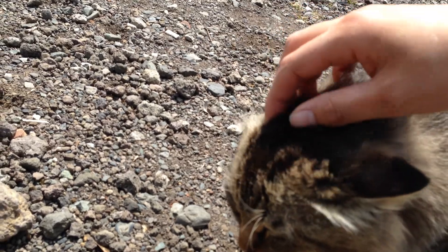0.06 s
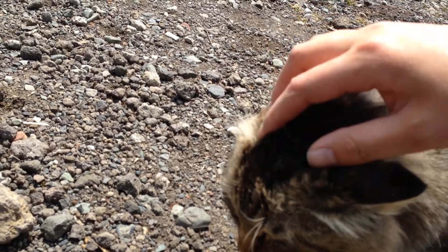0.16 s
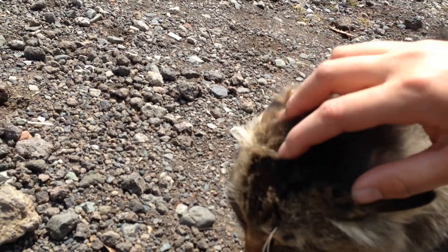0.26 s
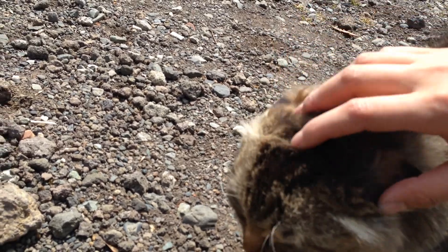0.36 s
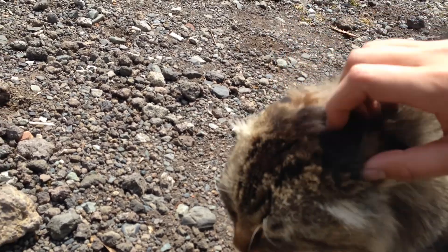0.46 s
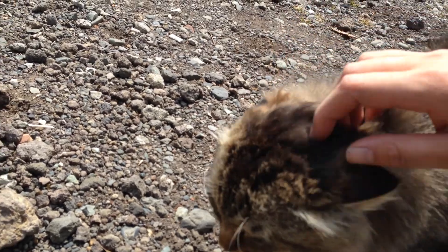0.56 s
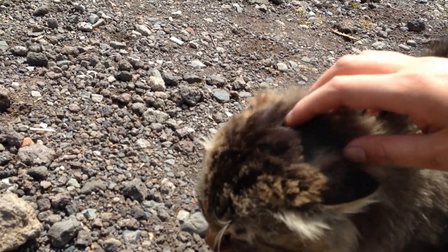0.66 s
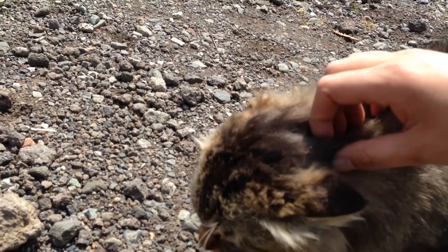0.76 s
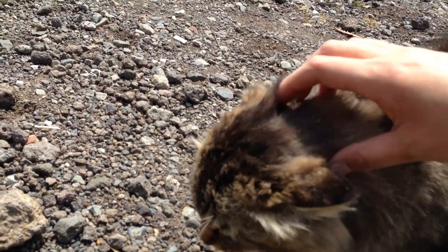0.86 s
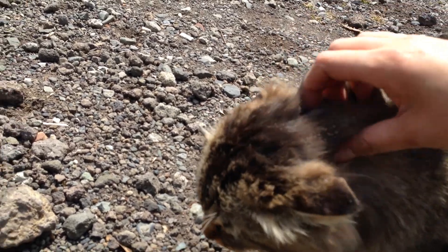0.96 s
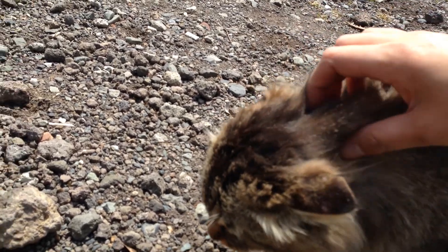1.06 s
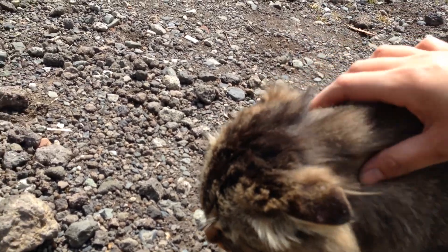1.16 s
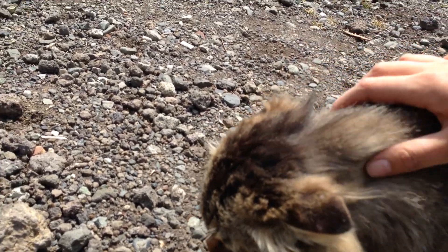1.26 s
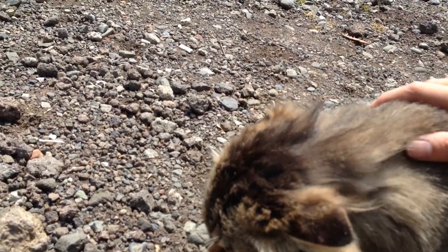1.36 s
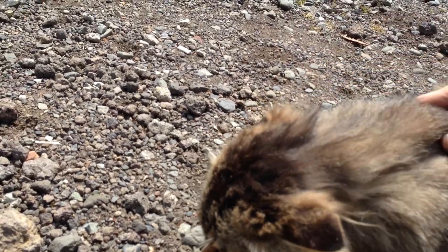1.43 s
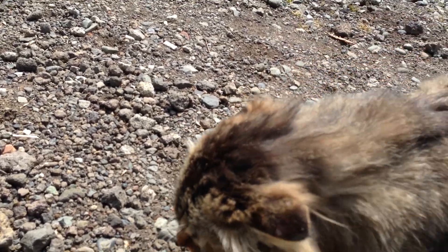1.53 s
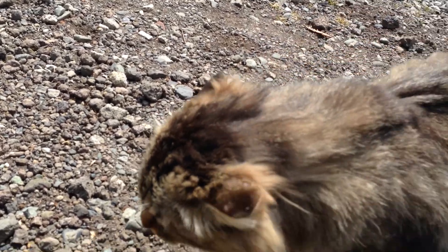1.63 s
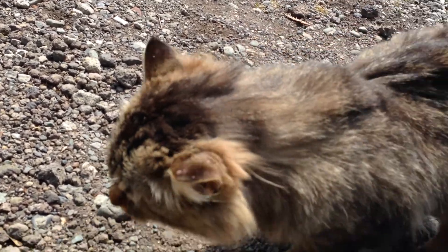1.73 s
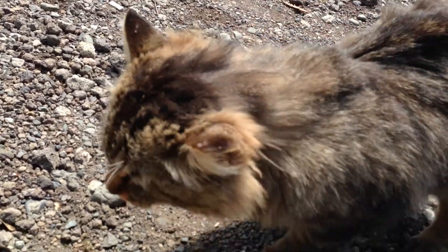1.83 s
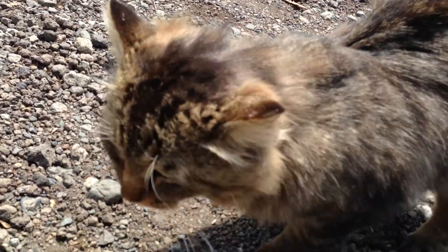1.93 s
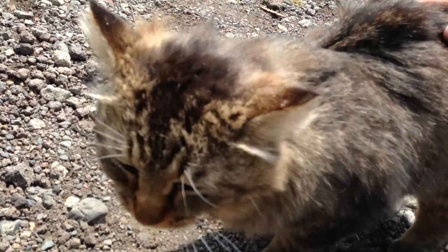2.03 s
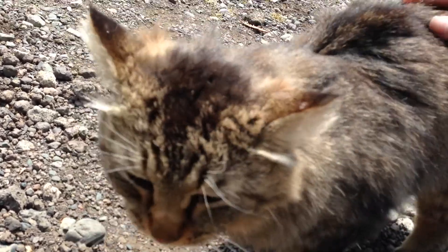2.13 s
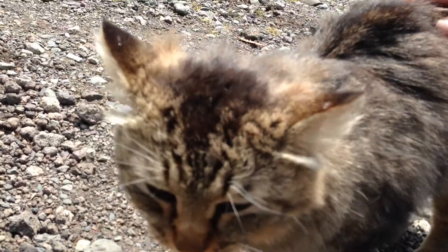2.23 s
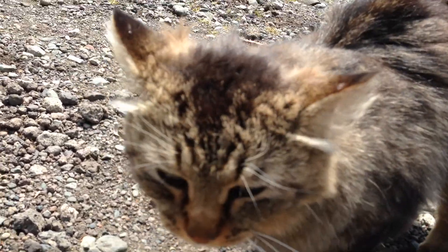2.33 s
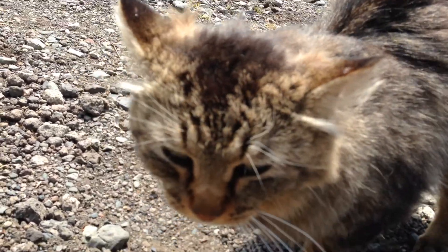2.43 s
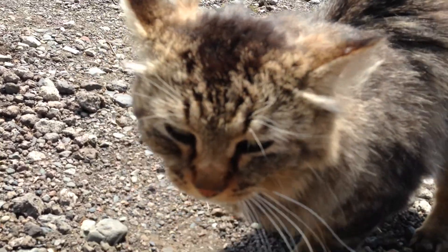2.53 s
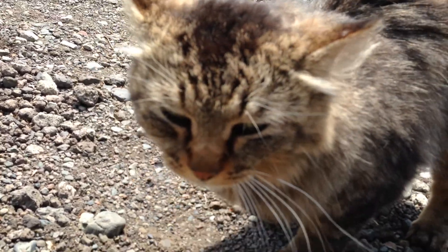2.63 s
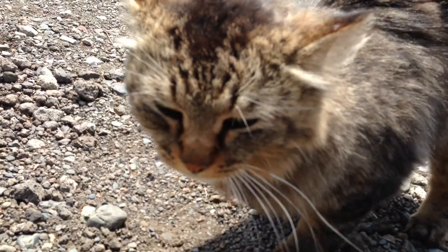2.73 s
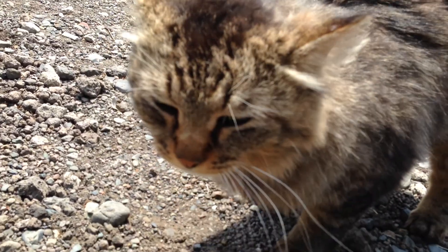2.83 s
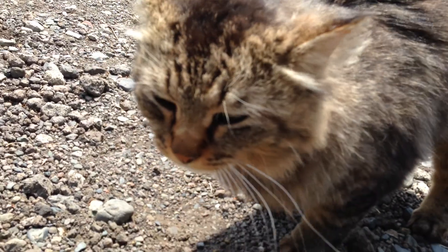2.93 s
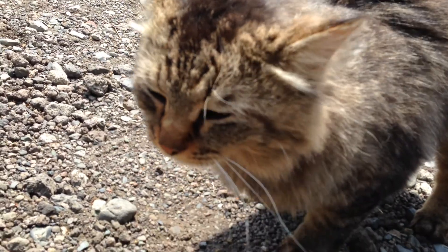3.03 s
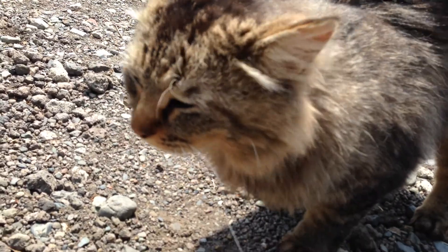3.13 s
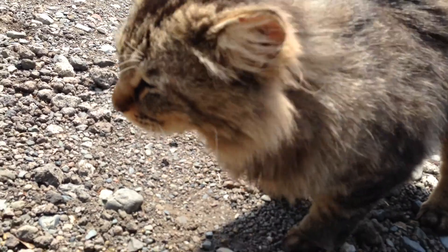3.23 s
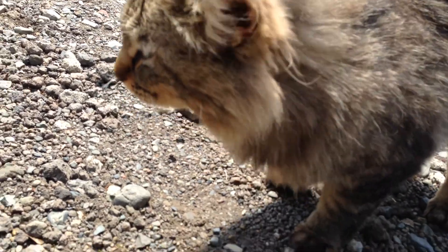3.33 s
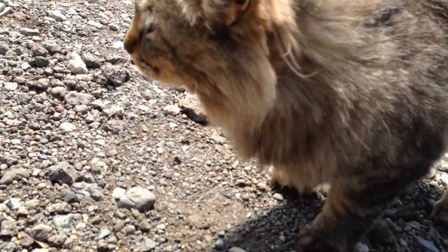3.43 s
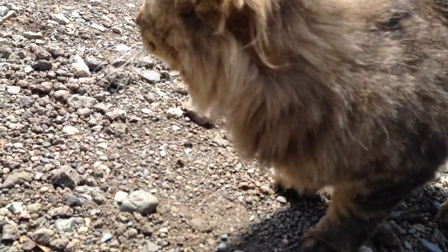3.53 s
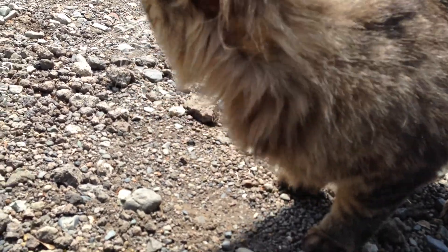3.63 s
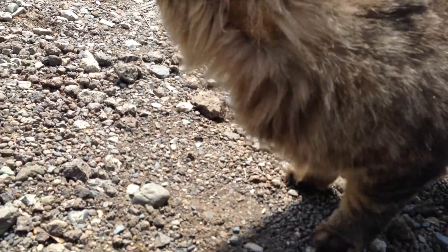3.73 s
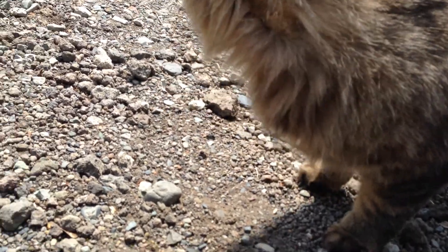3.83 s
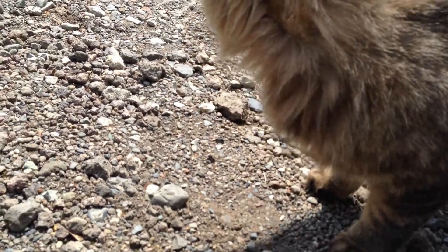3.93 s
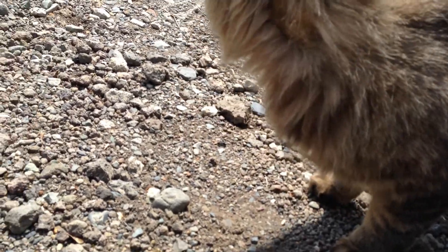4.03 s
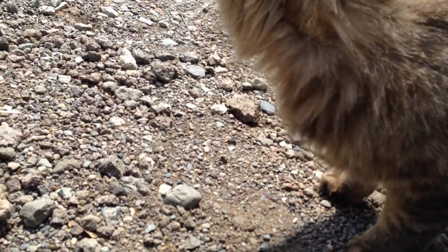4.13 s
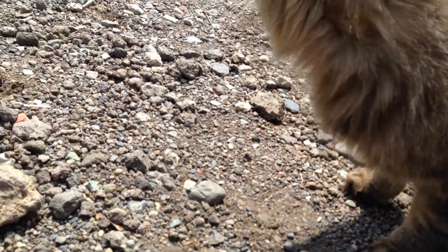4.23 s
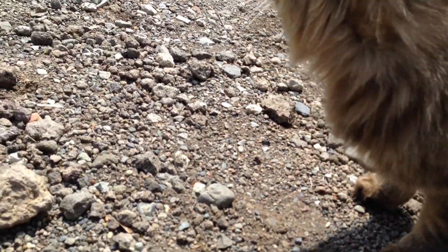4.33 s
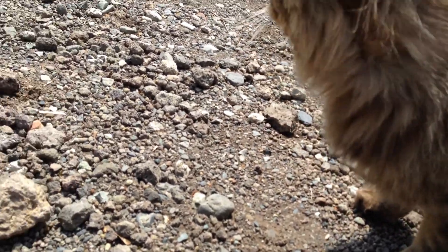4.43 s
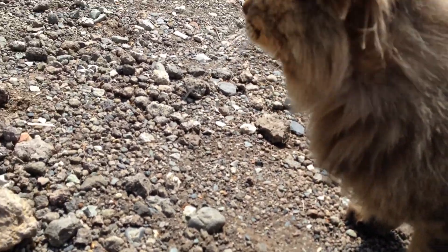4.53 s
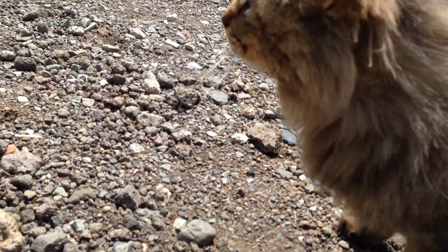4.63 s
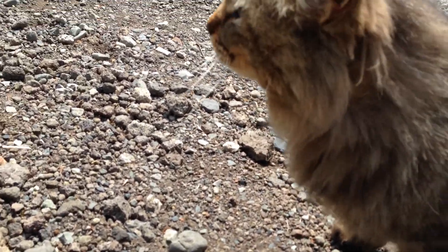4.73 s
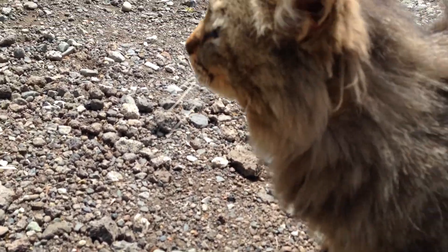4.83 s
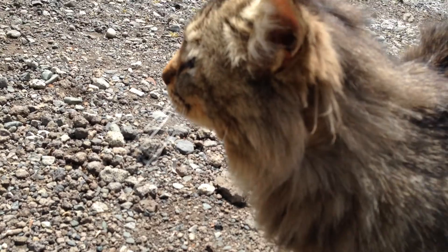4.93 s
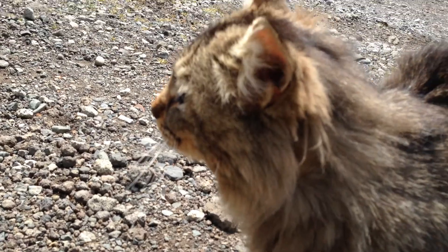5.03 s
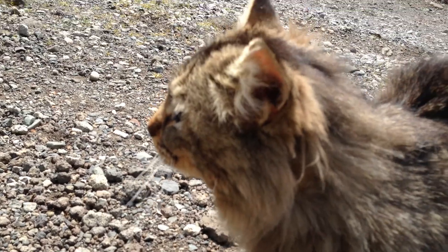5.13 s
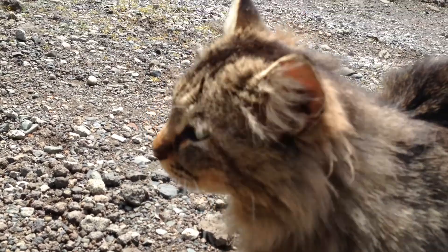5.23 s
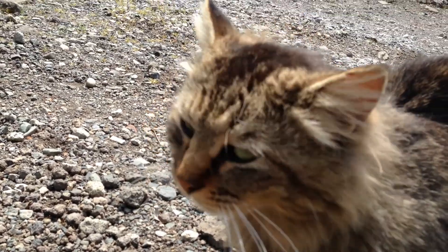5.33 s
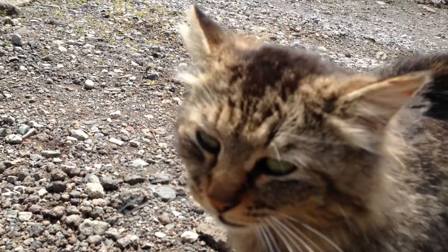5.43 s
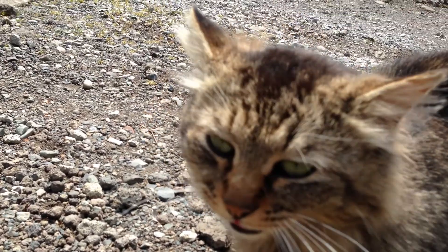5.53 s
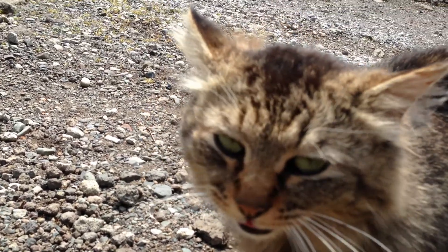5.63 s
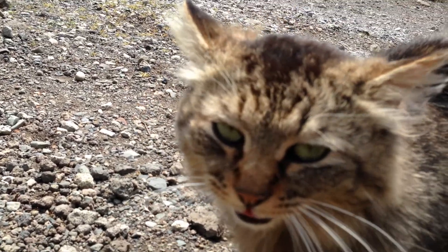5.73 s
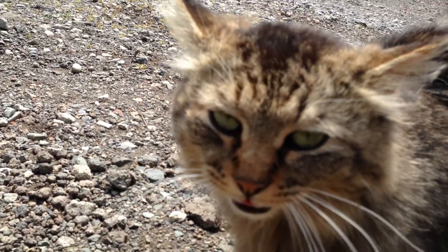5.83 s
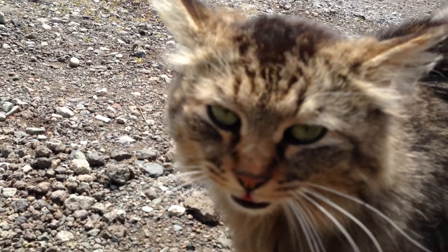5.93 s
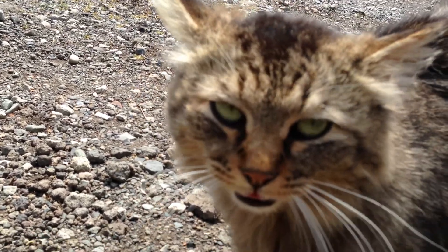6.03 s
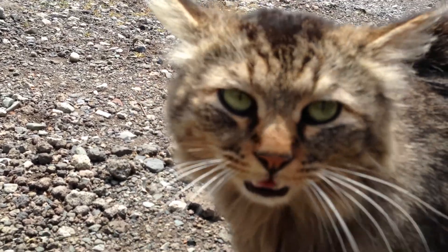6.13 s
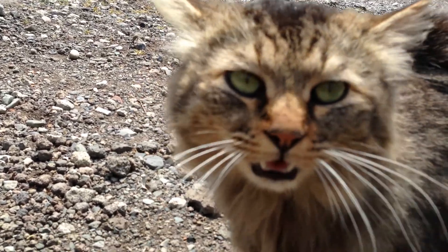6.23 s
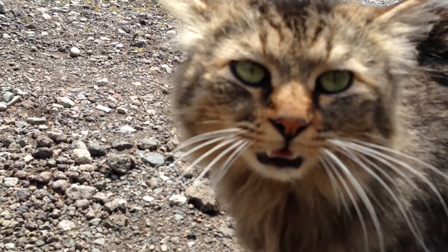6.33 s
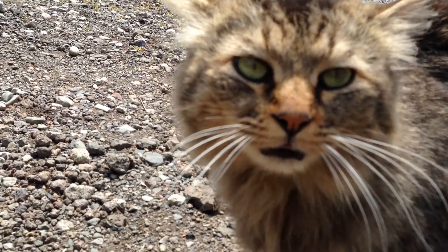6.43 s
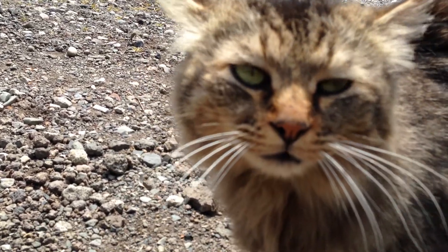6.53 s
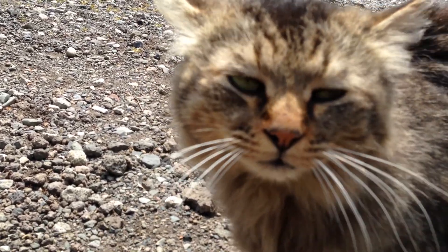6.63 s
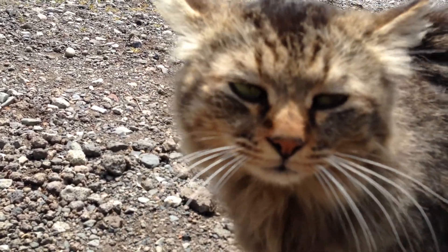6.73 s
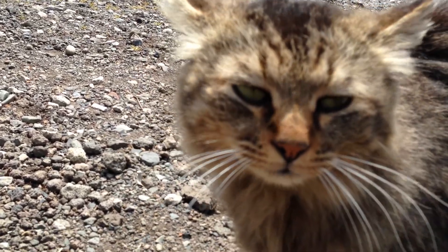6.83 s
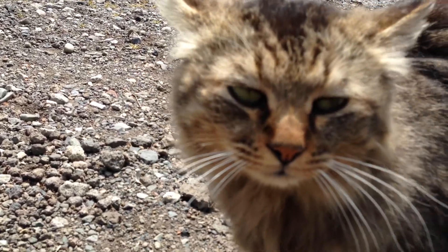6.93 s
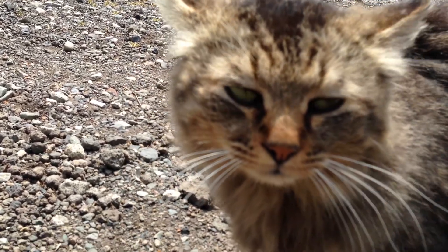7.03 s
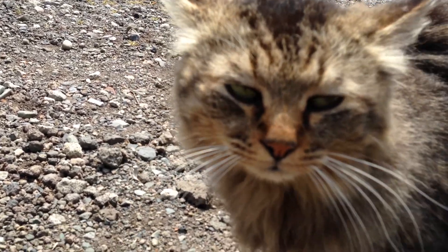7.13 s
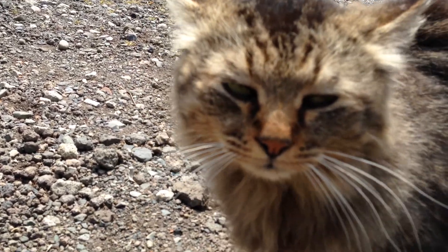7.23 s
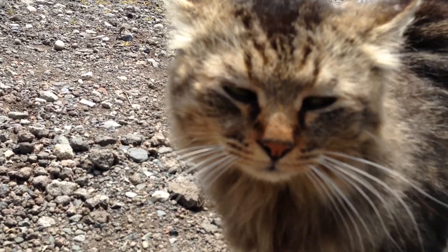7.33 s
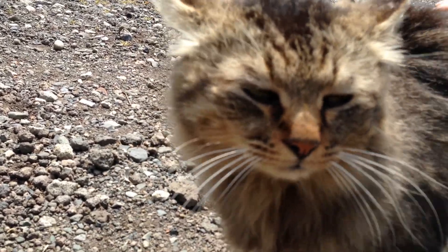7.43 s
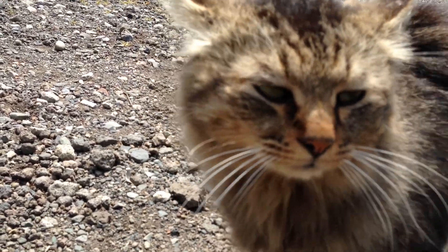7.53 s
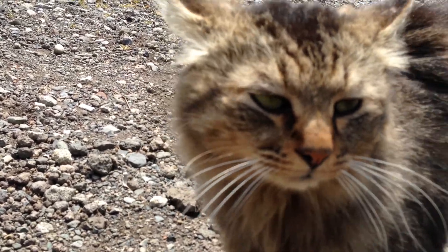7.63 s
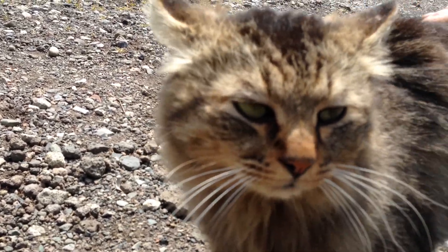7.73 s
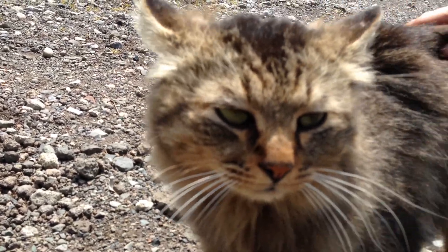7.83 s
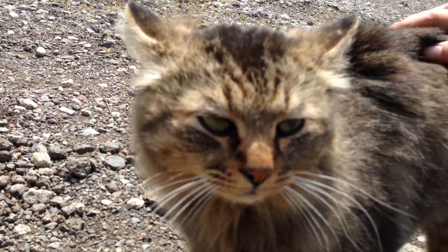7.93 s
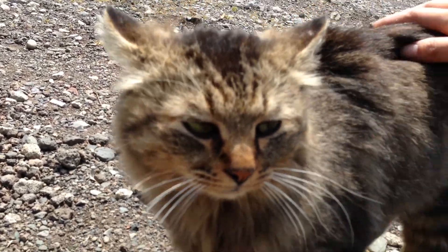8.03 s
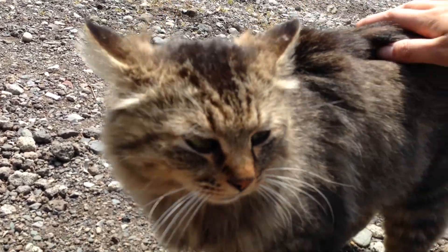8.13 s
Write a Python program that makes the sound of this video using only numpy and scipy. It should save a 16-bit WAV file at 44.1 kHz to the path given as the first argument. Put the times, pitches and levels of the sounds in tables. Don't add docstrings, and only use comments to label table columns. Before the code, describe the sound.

A quiet outdoor place, picked up by a small close microphone: soft hiss, low heaving wind and a faint far motor hum. A gritty tick opens it, and a distant bird trills in quick falling whistles from 0.2 to 0.75 s. Small wind puffs follow. From about 2.5 to 3.3 s the nearby cat gives a purring trill, around 30 pulses a second, raspy and mid-pitched, with a tiny break near 2.8 s, while another far bird sings. Wind bumps thud from 3.3 to 5 s; a nearer bird drops sweeping notes around 4 s. At 5.35 s a few purred pulses lead into a clear meow, near 470 Hz, rising slightly by 5.8 s, then sagging and wavering until a rough close at 6.4 s, amid a bird trill and strong wind thumps. Afterwards come faint fur rustle, small ticks around 7 s, and a last distant trill near 7.5 s.

```python
import sys
import numpy as np
from scipy import signal
from scipy.fft import rfft, irfft
from scipy.io import wavfile
from scipy.ndimage import uniform_filter1d

SR = 44100
rng = np.random.default_rng(int(sys.argv[2]) if len(sys.argv) > 2 else 0)


def to_linear_factor(level_db):
    exponent = np.asarray(level_db, float) / 20
    return 10 ** exponent


def int16_out(signal):
    q = np.round(np.clip(np.atleast_2d(signal).T, -1, 1) * 32767)
    wavfile.write(sys.argv[1], SR, q.astype(np.int16))


N = 360267
TIME = np.arange(N) / SR

# start in seconds, length in ms, pitch in Hz, level in dB.
BURSTS = [(2.514, 15.6, 506, -48.5), (2.54, 6.5, 527, -55), (2.562, 3.6, 543, -58), (2.577, 5.9, 446, -47),
          (2.611, 20, 459, -46), (2.644, 14, 439, -46), (2.678, 14.6, 433, -46.5), (2.711, 23, 456, -45),
          (2.745, 21, 483, -44.5), (2.78, 14.4, 571, -48), (2.847, 3.9, 517, -55), (2.864, 4.7, 526, -53.5),
          (2.886, 22, 493, -47.5), (2.919, 16, 583, -50), (2.957, 20, 510, -48.5), (2.988, 25, 478, -48),
          (3.024, 25, 500, -49), (3.061, 24.5, 498, -47), (3.096, 23, 566, -51), (3.131, 16.7, 469, -48),
          (3.168, 31, 472, -47), (3.207, 21, 440, -48), (3.238, 24, 547, -56.5), (5.346, 6, 476, -50.5),
          (5.367, 16, 475, -44), (5.403, 15, 476, -44), (5.431, 24, 464, -42.5), (6.348, 20.5, 587, -41),
          (6.383, 6, 440, -54)]


def noise():
    return rng.standard_normal(N)


def unit(x):
    return x / np.sqrt(np.mean(x ** 2))


def band(x, lo_hz, hi_hz, order=2):
    return signal.sosfilt(signal.butter(order, [lo_hz, hi_hz], "band", fs=SR, output="sos"), x)


def zero_phase(x, edge_hz, kind):
    return signal.sosfiltfilt(signal.butter(2, edge_hz, kind, fs=SR, output="sos"), x)


def walk(rate):
    k = int(SR / rate)
    steps = np.repeat(rng.standard_normal(N // k + 1), k)
    return unit(uniform_filter1d(uniform_filter1d(steps, k), k)[:N])


def curves(t, table):
    s, *columns = np.transpose(table)
    return [np.interp(t, s, c) for c in columns]


def peak(hz, centre_hz, width_hz):
    return 1 / (1 + (2 * (hz - centre_hz) / width_hz) ** 2)


def tract(hz, modes):
    return sum(to_linear_factor(db) * peak(hz, f, w) for f, w, db in modes)


def add(out, s, piece):
    i = int(s * SR)
    out[i:i + len(piece)] += piece[:len(out) - i]


def air():
    # frequency in Hz, density in dB per Hz.
    colour = [(15, -44), (25, -8), (53, 2.5), (113, -8.5), (140, -5), (260, -9), (290, -10.5), (458, -13.5),
              (583, -16), (685, -23.5), (1540, -25), (3350, -26.5), (4630, -26), (5020, -27.5),
              (15600, -31.5)]
    # time in seconds, level in dB.
    gust = [(0.0, -55.5), (0.45, -56.5), (0.91, -59), (1.71, -62), (2.25, -62), (2.57, -58.5),
            (2.91, -59.5), (3.46, -59), (3.69, -60), (4.53, -56), (5.03, -61.5), (5.75, -56), (5.96, -59),
            (6.48, -47), (6.67, -63), (7.39, -56.5), (7.6, -56.5), (8.17, -58)]
    hz = np.fft.rfftfreq(N, 1 / SR)
    f, db = np.transpose(colour)
    shape = to_linear_factor(np.interp(np.log(hz + 1), np.log(f), db))
    floor = unit(irfft(rfft(noise()) * shape, N)) * to_linear_factor(-59.5)
    gust_db = curves(TIME, gust)[0]
    gust_db = gust_db - np.median(gust_db)
    low = zero_phase(floor, 170, "low")
    below_hiss = zero_phase(floor, 650, "low")
    bass = low * to_linear_factor(gust_db + 3.0 * walk(14))
    middle = (below_hiss - low) * to_linear_factor(0.41 * gust_db + 1.3 * walk(9) + 1.3 * walk(3.19))
    hiss = (floor - below_hiss) * to_linear_factor(0.58 * walk(0.95))
    return bass + middle + hiss


def hum():
    # frequency in Hz, rms level in dB.
    lines = [(48, -66.5), (144, -79)]
    drift = np.cumsum(1 + 0.0124 * walk(2.2)) / SR
    out = 0
    for hz, db in lines:
        level_db = db + (2.0 + hz / 60) * walk(1.43)
        out = out + np.sqrt(2) * to_linear_factor(level_db) * np.sin(2 * np.pi * hz * drift)
    return out


def ticks():
    # start in seconds, peak level in dB, pitch in Hz, ring in ms.
    touches = [(0.023, -37.5, 4860, 0.54), (1.516, -51, 5200, 1.1), (1.568, -47.5, 1000, 1.6),
               (2.448, -46.5, 1330, 2.6), (2.499, -52, 1580, 3.5), (2.5494, -51.5, 4030, 5),
               (2.5487, -51.5, 6100, 5), (3.294, -52.5, 1710, 20), (5.312, -55, 1000, 7.2),
               (5.366, -57, 5000, 7.4), (5.3661, -57, 7000, 5.2), (6.4758, -48.5, 3580, 5.5),
               (6.4764, -48.5, 2520, 5.7), (6.916, -54, 1270, 6.3), (6.962, -43, 1790, 1.6),
               (7.005, -52, 1500, 2.3), (7.048, -39, 1010, 2.1), (7.077, -56, 2510, 5.4),
               (7.098, -58, 1870, 6.6), (7.19, -56, 1300, 3), (7.227, -52, 1300, 2.3), (7.27, -53, 1500, 3),
               (7.335, -57, 1110, 5), (7.448, -52, 1200, 2.5)]
    out, t = np.zeros(N), np.arange(0, .04, 1 / SR)
    for s, db, hz, ms in touches:
        touch = 1 - np.exp(-(t * hz / 0.14) ** 2)
        decay = np.exp(-np.log(1000) * t / (3 * ms / 1000))
        add(out, s, to_linear_factor(db) * touch * np.sin(2 * np.pi * hz * t) * decay)
    return out


def puffs():
    # time in seconds, peak level in dB, pitch in Hz, length in ms.
    strong = [(0.15, -47.5, 78, 15), (0.51, -47, 63.6, 17), (1.181, -49, 82.5, 32),
              (1.235, -46.5, 84.4, 30), (1.768, -49.5, 70, 31), (3.275, -32.5, 82.6, 3.1),
              (3.305, -35, 80.4, 5.8), (3.365, -35, 93.5, 12), (3.845, -45.5, 98, 6.3),
              (3.968, -40, 110, 8.4), (4.409, -34.5, 76, 13), (4.637, -41.5, 71.6, 34),
              (4.68, -41, 88.5, 16), (4.8, -38, 106, 7.8), (4.927, -46, 129, 17), (5.018, -40, 97, 10),
              (5.828, -43, 101, 14), (5.917, -33.5, 94, 8.4), (6.033, -42, 73.5, 11),
              (6.112, -34.5, 97.6, 4.1), (6.129, -27.5, 93, 2.3), (6.141, -34, 79.6, 17),
              (6.286, -38.5, 82.4, 14.5), (6.322, -37.5, 130.5, 6.9), (6.343, -40.5, 160, 7.6),
              (6.404, -42, 332, 3.2), (6.413, -30, 126, 12.3), (6.487, -40, 77, 26), (6.508, -34, 140, 11),
              (6.526, -39, 120, 22), (6.901, -41, 82, 4.3), (6.971, -41, 111, 7.2), (7.235, -52, 110, 11),
              (7.266, -49, 130, 6.7), (7.924, -53.5, 90, 14)]
    # first and last puff in seconds, peak level in dB.
    flurries = [(3.475, 3.475, -49), (3.817, 3.9, -47), (4.069, 4.181, -51), (4.446, 4.495, -48),
                (5.067, 5.139, -48), (5.772, 6.083, -47), (6.155, 6.25, -47), (6.575, 6.66, -44)]
    gap_s, flurry_hz, flurry_ms = 0.042, 70, 10.1
    starts = [(s, db) for a, b, db in flurries for s in np.arange(a, b + gap_s / 2, gap_s)]
    small = []
    for (s, db), c in zip(starts, rng.standard_normal((60, 4))):
        hz, ms = flurry_hz * np.exp(.15 * c[2]), flurry_ms * np.exp(.3 * c[3])
        small.append((s + .004 * c[0], db + 1.5 * c[1], hz, ms))
    out, t = np.zeros(N), np.arange(-.06, .06, 1 / SR)
    for (s, db, hz, ms), chance in zip(strong + small, rng.random(90)):
        turn = 2 * np.pi * (hz * t + .3 * (chance - .5))
        push = -(np.sin(turn) + 0.23 * np.sin(2 * turn) + 0.073 * np.sin(3 * turn))
        add(out, s - .06, to_linear_factor(db) * np.exp(-(t / (0.00063 * ms)) ** 2) * push)
    return out


def whistle(events, note, pitch=1):
    out, (ms, hz, db) = np.zeros(N), np.transpose(note)
    t = np.arange(0, ms[-1], 1000 / SR)
    for (s, peak_db), c in zip(events, rng.standard_normal((len(events), 12))):
        hz_now = np.interp(t, ms, hz) * pitch * (1 + 0.0055 * c[0])
        tone = np.sin(2 * np.pi * np.cumsum(hz_now) / SR)
        db_now = peak_db + np.interp(t, ms, db + 1.6 * c[1:len(ms) + 1])
        add(out, s - .002, to_linear_factor(db_now) * tone * signal.windows.tukey(len(t), .3))
    return out


def phrase(rows):
    notes = []
    for first, last, gap, loudest, db in rows:
        for s in np.linspace(first, last, round((last - first) / gap) + 1):
            notes.append((s, db - 11 * abs(s - loudest)))
    return notes


def trilling_bird():
    # time in seconds, peak level in dB.
    first = [(0.208, -63), (0.254, -67), (0.324, -63), (0.38, -61), (0.434, -60.5), (0.491, -62),
             (0.546, -61), (0.599, -63), (0.66, -64.5), (0.744, -68)]
    # first note, last note, gap and loudest moment in seconds, peak level in dB.
    again = [(5.503, 5.86, 0.0575, 5.5, -58.5)]
    # time in seconds, peak level in dB.
    late = [(7.323, -61), (7.381, -63), (7.438, -60), (7.494, -57), (7.549, -60), (7.614, -59.5),
            (7.682, -64)]
    # time in ms, pitch in Hz, level in dB.
    note = [(0, 4880, -3), (3, 4500, -2.5), (8, 4300, -1), (13, 4400, -20)]
    late_note = [(0, 4950, -6), (3, 4750, -2), (8, 4450, -6), (14, 3800, -9)]
    return whistle(first, note) + whistle(late, late_note) + whistle(phrase(again), note, pitch=1.05)


def drone():
    centre_hz, width_hz, level_db = 292, 43, -67
    swell = np.interp(TIME, [0.6, 2, 2.1, 2], [0, 1, 1, 0])
    return to_linear_factor(level_db) * swell * unit(band(noise(), centre_hz - width_hz / 2, centre_hz + width_hz / 2))


def singing_bird():
    # time in seconds, peak level in dB.
    song = [(2.256, -65), (2.37, -66), (2.487, -64), (2.61, -62.5), (2.735, -57.5), (2.862, -58),
            (2.984, -61), (6.152, -61), (6.287, -63), (7.758, -67), (7.897, -63)]
    # time in ms, pitch in Hz, level in dB.
    note = [(0, 3700, -10), (5, 4600, -6), (10, 5250, -1), (15, 5000, -4), (19, 4500, -10), (23, 4200, -2),
            (35, 3750, -2), (44, 3080, -6), (54, 3120, -2), (74, 3380, -5)]
    return whistle(song, note)


def trees(x):
    t = TIME[:SR // 3]
    tail = noise()[:len(t)] * np.exp(-t / .045) * (t > .004)
    return x + to_linear_factor(-4.0) * signal.fftconvolve(x, tail / np.sqrt(np.sum(tail ** 2)))[:N]


def mouth_at(s):
    # time in seconds, centre in Hz, width in Hz, ring in trills in dB.
    mouth = [(2.5, 1590, 170, -16), (2.68, 1664, 152, 1), (2.78, 1590, 170, -0.5), (3.3, 1637, 170, -4),
             (5.3, 1800, 250, -21), (5.45, 1790, 288, 6), (5.65, 2137, 336, 2), (5.9, 1735, 424, 0),
             (5.95, 1547, 437, 0), (6.33, 1510, 494, -22), (6.4, 1300, 720, -16)]
    return curves(s, mouth)


def trill():
    # time in seconds, arch as a share of pitch.
    arches = [(2.52, 0.2), (2.6, 0.23), (2.78, 0.42), (2.9, 0.4), (3.1, 0.3), (3.24, 0.31), (5.3, 0.11),
              (5.46, 0.1), (6.33, 0.27)]
    # time in seconds, lean as a share of pitch.
    leans = [(2.51, -0.53), (2.6, 0.046), (2.7, -0.19), (2.78, 0.15), (3.238, -0.16), (5.34, -0.48),
             (5.37, -0.11), (5.43, -0.12), (6.34, 0.34)]
    # centre in Hz, width in Hz, level in dB.
    steady_tract = [(465, 170, -8), (1010, 400, 1), (3110, 400, -36), (3750, 400, -35)]
    # centre in Hz, width in Hz, share lost.
    palate = [(1470, 190, 0.49), (457, 230, 0.28)]
    out, k = np.zeros(N), np.arange(1, 10)[:, None]
    knots = np.linspace(0, 1, 16)
    for (s, ms, hz, db), c in zip(BURSTS, rng.standard_normal((len(BURSTS), 16))):
        u = np.linspace(0, 1, int((ms + 9) * SR / 1000))
        arch = curves(s, arches)[0] * (.18 - (2 * u - 1) ** 2)
        lean = curves(s, leans)[0] * (u - .5)
        f = hz * (1 + arch + lean + .01 * np.interp(u, knots, c))
        centre_hz, width_hz, ring_db = mouth_at(s)
        gains = tract(k * f, steady_tract) + to_linear_factor(ring_db) * peak(k * f, centre_hz, width_hz)
        if 5 < s < 6:
            gains = gains * (1 - sum(share * peak(k * f, at, wide) for at, wide, share in palate))
        phase = 2 * np.pi * np.cumsum(f) / SR
        y = np.sum(gains * np.sin(k * phase - 0.59 * k ** 2), axis=0)
        y = y * to_linear_factor(1.2 * np.interp(u, knots, c[::-1]))
        swell = np.clip(np.sin(np.pi * u ** .95) / .62, 0, 1)
        add(out, s - .0045, np.sqrt(2) * to_linear_factor(db - 0.5) * y * swell)
    return out


def rasp():
    # starts, full, fades and gone in seconds, level in dB.
    flows = [
        (2.57, 2.6, 2.775, 2.832, -51.5),
        (2.84, 2.9, 3.25, 3.295, -52),
        (5.345, 5.44, 5.455, 5.48, -51.5),
        (6.325, 6.337, 6.372, 6.395, -47.5),
    ]
    # centre in Hz, width in Hz, level in dB.
    throat_tract = [(369, 150, -5), (1110, 430, -6), (2160, 89, -15), (3360, 130, -35), (3760, 250, -25.5)]
    # time in seconds, level against the airflow in dB.
    haze_level = [(2.6, -14.5), (2.8, -20), (2.9, -22), (3.27, -23), (5.4, -14), (6.35, -17.5)]
    hz = np.fft.rfftfreq(N, 1 / SR)
    gaps = np.clip(1 + .3 * noise()[:N // 40], .3, 3) * SR / 620
    slaps = 0.2 * noise()
    at = np.cumsum(gaps).astype(int)
    signs = np.where(rng.random(N // 40) < .45, -1, 1)
    slaps[at[at < N]] += signs[at < N]
    slaps = rfft(slaps) * (1 - .8 * peak(hz, 2480., 450.))
    hiss = to_linear_factor(-13.5) * unit(band(noise(), 2100, 2160) + band(noise(), 590, 1500))
    teeth = to_linear_factor(curves(TIME, haze_level)[0]) * unit(band(noise(), 3070, 4050, order=3))
    throat, mouth, haze = 0, 0, 0
    for *s, db in flows:
        flow = to_linear_factor(db) * np.interp(TIME, s, [0, 1, 1, 0])
        centre_hz, width_hz, _ = mouth_at(np.mean(s))
        ring = irfft(slaps * peak(hz, centre_hz, width_hz) ** 0.9, N)
        closing_db = -10.5 * (s[0] > 6)
        mouth = mouth + flow * (ring / ring.std() * to_linear_factor(closing_db) + hiss * to_linear_factor(0))
        if s[0] > 6:
            mouth = mouth * to_linear_factor(0)
        haze = haze + flow * teeth
        throat = throat + flow * irfft(slaps * tract(hz, throat_tract), N) / ring.std()
    voiced = sum((TIME > s + .002) & (TIME < s + ms / 1000) for s, ms, *_ in BURSTS)
    held = uniform_filter1d(1. * voiced, size=150)
    shut = sum(np.exp(-((TIME - s + 0.0094) / 0.0018) ** 2) for s, *_ in BURSTS)
    return to_linear_factor(0.5 - 9 * shut) * (throat * to_linear_factor(-15 * held) + mouth * to_linear_factor(-6.5 * held)) + haze


def sweeping_bird():
    # first note, last note, gap and loudest moment in seconds, peak level in dB.
    sweeps = [(3.985, 4.148, 0.0813, 4.0, -59)]
    # time in ms, pitch in Hz, level in dB.
    sweep_note = [(0, 4200, -6), (3, 4150, 2), (8, 3500, -3.5), (14, 2800, -4)]
    lead_note = [(0, 5000, -4), (5, 4800, 0), (11, 4150, -2), (18, 3750, -7)]
    lead = whistle([(3.871, -60.5)], lead_note[:3], pitch=0.9) + whistle([(3.915, -60.5)], lead_note)
    return lead + whistle(phrase(sweeps), sweep_note)


def meow():
    # time in seconds, pitch in Hz, effort in dB, gape 0-1, twang 0-1.
    call = [
        (5.462, 470, -43, 0.93, 0.06),
        (5.575, 471.7, -44, 0.96, 0.7),
        (5.655, 507.7, -44.5, 0.59, 0.84),
        (5.802, 520.8, -42.5, 0, 0.89),
        (5.93, 484, -43.5, 0.02, 0.55),
        (6.013, 443.7, -44.5, 0.22, 0.54),
        (6.148, 459.5, -44.5, 0.24, 0.52),
        (6.222, 449, -44, 0.2, 0.4),
        (6.333, 453, -43.5, 0.08, 0.3),
    ]
    # time in seconds, pitch jump in %, brief sag in %, level dip in dB.
    twitches = [(5.506, 1, -2, -2), (5.554, 8, -4.5, -3), (5.6, 3, -4, -2.5), (5.652, -0.5, 0.5, 2),
                (5.711, -2.5, -1, 1), (5.742, -6, -2, 0.5), (5.765, 0.5, 0, -0.5), (5.782, -1, 0.7, 0.3),
                (5.815, 1, 0.9, 0.3), (5.849, -2, 2, -1), (5.875, 1, 0.3, 1.5), (5.9, 1.5, 0.1, 0.3),
                (5.954, -2.5, 1, -1.5), (6.03, -1.4, 0.2, -0.7), (6.075, 0.7, -0.2, -3),
                (6.14, -1.5, 0.3, -2), (6.191, 0.3, -3, -2), (6.232, 0, -8, -5), (6.266, 2, -4, -4),
                (6.302, -1.5, -2.5, -2)]
    # time in seconds, centre in Hz, level against effort in dB.
    top_ring = [(5.47, 3550, -44), (5.58, 3870, -25), (5.72, 4000, -20), (5.79, 4620, -24),
                (5.85, 4570, -28), (5.92, 3770, -12), (6.04, 4000, -13.5), (6.14, 4020, -37),
                (6.29, 3697, -15)]
    # time in seconds, width in Hz.
    upper_width = [(5.5, 700), (5.95, 670), (6.05, 521), (6.3, 400)]
    # time and spread in seconds, centre and width in Hz, dB against effort.
    cheek = [(5.949, 0.067, 2540, 300, -15.5), (6.205, .12, 2250, 300, -25)]
    # time in seconds, share swallowed.
    nasal = [(5.54, 0), (5.62, 0.77), (5.73, 0.32), (5.8, 0.045), (5.88, 0.032)]
    start, end = call[0][0] - .006, call[-1][0] + 0.0084
    t = np.arange(start, end, 1 / SR)
    hz, effort_db, gape, twang = curves(t, call)
    jerk = sum(np.exp(-((t - at) / 0.0043) ** 2) for at, *_ in twitches)
    gape = gape + 0.25 * (1.2 - gape) * jerk
    mouth_db = effort_db - 9.5 + 17.5 * gape
    upper_db = effort_db - 26 + 17.5 * twang
    upper_hz = 3155 + 120 * (t - t[0])
    chest = to_linear_factor(effort_db) * tract(hz, [(372, 283, -4.5)])
    throat = to_linear_factor(effort_db) * tract(2 * hz, [(987, 274, 1.6)])

    dip_db = 0
    for at, jump, sag, db in twitches:
        after = np.clip(t - at, 0, None)
        step = (1 - np.exp(-after / .0035)) * np.exp(-after / 0.0192)
        bend = jump * step + sag * np.exp(-((t - at) / 0.007) ** 2)
        hz = hz * (1 + bend / 100)
        dip_db = dip_db + db * np.exp(-((t - at) / .004) ** 2)
    hz = hz * (1 + 0.0057 * walk(68.94)[:len(t)])
    phase = 2 * np.pi * np.cumsum(hz) / SR

    k = np.arange(3, 14)[:, None]
    partial_hz = k * hz
    mouth = peak(partial_hz, *mouth_at(t)[:2])
    upper = peak(partial_hz, upper_hz, curves(t, upper_width)[0])
    upper = upper * peak(np.maximum(partial_hz, 3700), 3400.0, 900.)
    gains = 0
    for db, g in ((mouth_db, mouth), (upper_db, upper)):
        gains = gains + to_linear_factor(db) * g / np.sqrt(np.sum(g ** 2, axis=0))
    top_hz, top_db = curves(t, top_ring)
    gains = gains + to_linear_factor(effort_db + top_db) * peak(partial_hz, top_hz, 340)
    gains = gains + to_linear_factor(effort_db - 42) * peak(partial_hz, 5630, 900.)
    for at, lasts, cheek_hz, width_hz, db in cheek:
        passing = np.exp(-((t - at) / lasts) ** 2)
        gains = gains + to_linear_factor(effort_db + db) * passing * peak(partial_hz, cheek_hz, width_hz)
    gains = gains * (1 - curves(t, nasal)[0] * peak(partial_hz, 1550, 140))
    shimmer = to_linear_factor(1.5 * np.array([walk(30)[:len(t)] for _ in k]))
    voice = chest * np.sin(phase) + throat * np.sin(2 * phase - .8)
    voice = voice + np.sum(gains * shimmer * np.sin(k * phase - 0.313 * k ** 2), axis=0)

    leak_db = -36 - 10 * (t > 5.77)
    breath = to_linear_factor(mouth_db + leak_db) * unit(band(noise(), 690, 2500)[:len(t)])
    breath = breath + to_linear_factor(upper_db - 12.0) * unit(band(noise(), 2360, 4400, order=4)[:len(t)])
    hoarse_db = 6 * np.exp(-(t - t[0]) / 0.1)
    y = np.sqrt(2) * voice * to_linear_factor(dip_db) + breath * to_linear_factor(-2.5 * dip_db + hoarse_db)
    out = np.zeros(N)
    add(out, t[0], y * np.clip(np.minimum(t - t[0], t[-1] - t) / 0.0077, 0, 1))
    return out


def fur():
    # time in seconds, level in dB.
    rustle = [(0, -90), (1.3, -98), (1.5, -83), (1.7, -100), (6.3, -64.5), (6.5, -68.5), (6.8, -73.5),
              (7.1, -69), (7.5, -74), (8.2, -78)]
    hairs = rng.random(N) < 2500 / SR
    grains = hairs * to_linear_factor(2 * rng.exponential(size=N)) * noise()
    return unit(band(grains, 500, 2280)) * to_linear_factor(curves(TIME, rustle)[0] + 0.95 * walk(21))


def duck(ground, cat):
    loud = np.clip(uniform_filter1d(np.abs(cat), size=2048) / to_linear_factor(-52), 0, 1)
    return ground - .9 * loud * zero_phase(ground, [1700, 2750], "band")


def scene():
    cat = trill() + rasp() + meow()
    birds = trees(trilling_bird() + singing_bird()) + sweeping_bird()
    ground = duck(air() + fur(), cat) + hum() + drone()
    return (cat + birds + puffs() + ticks() + ground)[None]


def band_limit(x):
    return signal.sosfilt(signal.butter(12, 15710, fs=SR, output="sos"), x)


def record(dry):
    hz = np.fft.rfftfreq(N, 1 / SR)
    housing = 1 - 0.29 * peak(hz, 2380, 870)
    dipped = irfft(rfft(dry) * housing * (hz < 15320), N)
    heard = signal.sosfilt(signal.butter(3, 40, "high", fs=SR, output="sos"), dipped)
    return band_limit(heard)


dry = scene()
out = record(dry)
int16_out(out)
```